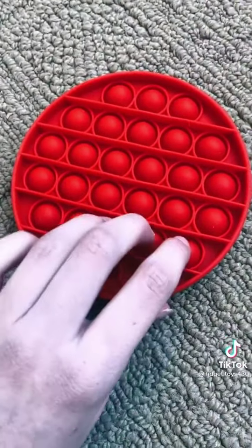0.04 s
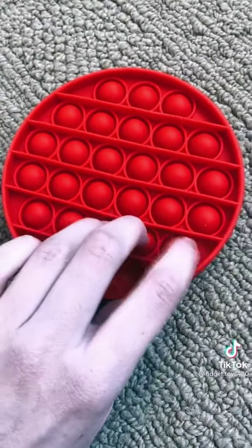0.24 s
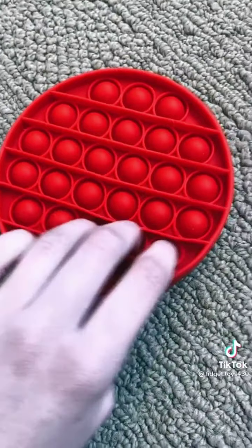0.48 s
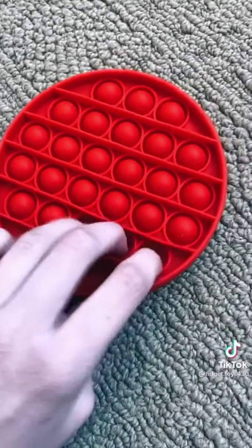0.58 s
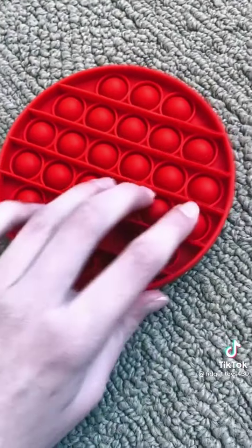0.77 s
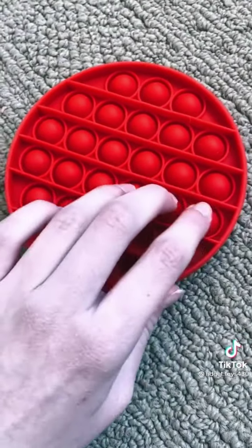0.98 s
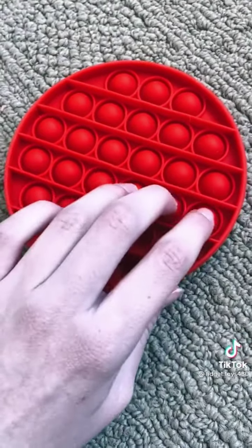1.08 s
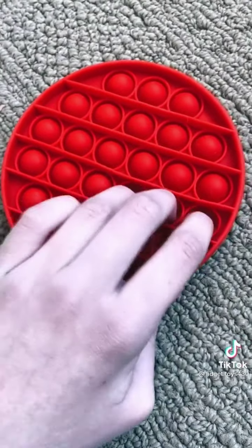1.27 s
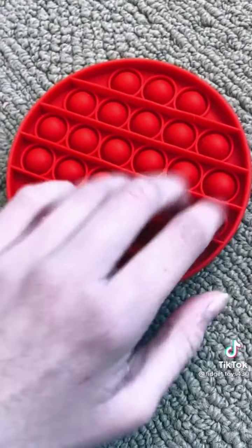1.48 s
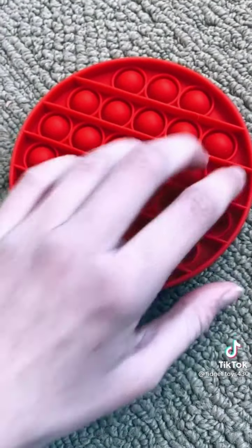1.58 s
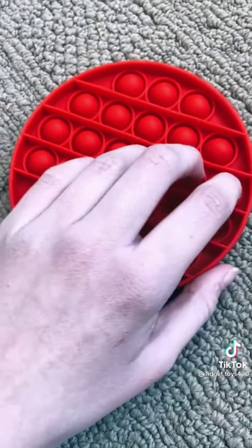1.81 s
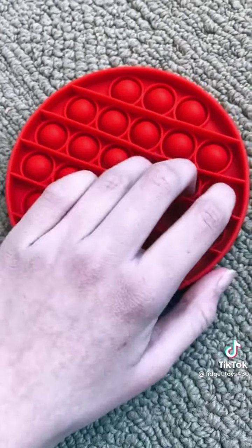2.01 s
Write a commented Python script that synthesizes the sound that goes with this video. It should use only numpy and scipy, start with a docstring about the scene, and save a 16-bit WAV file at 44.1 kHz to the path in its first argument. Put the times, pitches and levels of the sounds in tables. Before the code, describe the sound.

Fingers pop rubbery bubbles of a silicone fidget toy, sharp hollow snaps in a quiet room

```python
"""Fingers press the bubbles of a silicone popping toy on a carpet, close by in a small quiet room.
Each pop is one or more snaps: a filtered click whose highs arrive before its lows, a tiny falling
chirp, topped with a bright crack and a spit of noise. Between the pops, noise swells are fingertips
sliding and short resonant puffs are their ticks; three low knocks are the toy bumping the carpet.
Echoes, ringing modes and a noise tail make the room, over a steady hush and drone."""
import sys
import numpy as np
from scipy import signal
from scipy.fft import rfft, irfft
from scipy.io import wavfile

SR = 44100
rng = np.random.default_rng(int(sys.argv[2]) if len(sys.argv) > 2 else 0)


def output_pcm(signal):
    """Save a mono or channel-first signal as 16-bit PCM at the path in sys.argv[1].

    Samples are clipped to [-1, 1] before scaling.
    """
    pcm = np.clip(np.atleast_2d(signal).T, -1, 1) * 32767
    wavfile.write(sys.argv[1], SR, np.round(pcm).astype(np.int16))


N = 90404  # length in samples
SHORT = 4096  # samples given to each short sound
TIME = np.arange(N) / SR
HZ = np.maximum(np.fft.rfftfreq(N, 1 / SR), 1)

# Steady hush of the room. Each row: frequency in Hz, relative level in dB per Hz.
HUSH_SPECTRUM = [(15, -24.5), (25, 8), (206, -2), (607, -11), (775, -10.5), (887, -13.5), (1700, -13),
                 (1840, -13), (2220, -17.5), (5430, -20), (8590, -23.5), (14800, -22), (16000, -47.5)]
# A fingertip slides. Each row: middle in seconds, spread in seconds, level at the middle in dB,
# centre in Hz, sharpness Q.
FINGER_SLIDES = [(.150, 0.0074, -60, 6840, 0.91), (.405, 0.025, -58.5, 10050, 2.4),
                 (.49, 0.041, -61.5, 8880, 0.34), (.45, 0.063, -62, 1574, 0.86), (.46, .06, -61, 300, .8),
                 (.72, 0.17, -67.5, 1700, 1.12), (1.291, 0.033, -66.5, 1400, 0.76),
                 (1.375, 0.012, -61.5, 1590, 0.75), (1.374, 0.0097, -68, 5200, 6.7),
                 (1.535, .012, -60, 169.7, 1.27), (1.65, 0.083, -69.5, 10640, 1.08),
                 (1.97, .08, -70, 10900, 1.44), (2.029, 0.023, -68, 2500, .4)]
# A dome buckles. Each row: start in seconds, strength in dB, top edge in Hz, ring in Hz,
# ring boost in dB, ring Q, thump in Hz, thump in dB, crack in dB, spit in dB (these three relative
# to the strength), lag of each frequency in its own cycles.
DOME_SNAPS = [(0.1781, -6, 980, 600, 2.5, 2.04, 198, 9.5, -48.5, -46, 0.7),
              (0.201, 2.5, 1270, 450, 1, 2, 242, 3, -37, -26.5, 0.92),
              (0.2121, 20, 2416, 2200, 3.5, 4, 195, 0, -23.5, -25.5, .75),
              (0.2646, 5.5, 2320, 507, 5.5, 3.4, 182, 7, -7.5, -27, 0.822),
              (0.5107, -19.5, 1050, 430, 6.5, 4.3, 193, 11, -26, -16.5, 0.93),
              (0.6803, -18, 1196, 921, 3, 4.9, 260, 9.5, -22.5, -15.5, 0.83),
              (1.1417, 2.5, 1563, 913, 6.5, 2.23, 237, 4.5, -38, -27, 0.53),
              (1.1476, 4, 2750, 1450, 6, 3.1, 201, 2.5, -0.5, -17.5, 0.49),
              (1.1512, 13.5, 2160, 950, 6, 1.8, 220, 0.5, -22.5, -15, 0.548),
              (1.1591, 10.5, 2220, 1450, 10.5, 6.2, 205, 5.5, -15.5, -25.5, 0.64),
              (1.7536, -20, 868, 610, 15, 3.3, 225, 19, -37.5, -34, 0.95),
              (1.7732, 9.5, 1850, 1440, 14, 10.7, 335, 5, -10, -24.5, 0.59),
              (1.7860, 8.5, 3230, 1480, 15, 3.73, 145, 3.5, 1, -28, 0.538)]
# The bright crack of a dome. Each row: resonance in Hz, level in dB, sharpness Q.
CRACK_MODES = [(3589, -5, 1.7), (5000, -0.5, 4.68)]
# Dips that hollow out the direct sound. Each row: frequency in Hz, depth from 0 to 1, sharpness Q.
HOLLOW_DIPS = [(696, .92, 18), (1225, .85, 6), (3436, 0.6, 12), (4730, 0.4, 42), (6300, 0.1, 10)]
# Near surfaces answer. Each row: delay in seconds, level in dB, centre in Hz, sharpness Q.
NEAR_ECHOES = [(.0066, -12.5, 660, 6), (.0128, -2, 1100, 5.4), (0.013, -14.5, 2900, 1.2),
               (.0140, -8, 250, 1.4), (0.021, -13, 950, 2.3)]
# Room modes that stand out. Each row: frequency in Hz, level in dB, sharpness Q.
RINGING_MODES = [(76, 9, 8.2), (99, 0, 17), (215, -8.5, 18), (746, -8.5, 46), (992, -10, 46),
                 (1117, -5, 97), (2150, -9.5, 67)]
# The room's tail. Each row: frequency in Hz, level in dB, time to fall by 60 dB in seconds.
TAIL_BANDS = [(80, -10, 0.18), (158, -14, 0.16), (276, -13, 0.18), (500, -22, .27), (810, -15, 0.33),
              (1100, -9.5, 0.32), (1330, -22, 0.33), (2100, -18, .28), (3400, -11.5, 0.22),
              (4800, -13, 0.18), (8000, -15, .26), (14000, -14, 0.17)]
# Skin lets go of the rubber. Each row: start in seconds, rubber in dB, spit in dB, decay in seconds.
FINGER_TICKS = [(.2583, -22, 1, 0.00039), (0.261, -9, -8.5, .004), (0.7019, -23.5, -27.5, 0.00068),
                (0.7778, -30, -34, .001), (1.5048, -15.5, -39, 0.00078), (1.5100, -18, -30.5, 0.0032),
                (2.0033, -7.5, -23, 0.0013)]
# What a tick rings with. Each row: frequency in Hz, level in dB, sharpness Q.
RUBBER_MODES = [(1480, 6.5, 9), (2300, -2.5, 1.3), (5010, -9, 3)]
# The toy bumps the carpet. Each row: start in seconds, level in dB, pitch in Hz.
CARPET_BUMPS = [(.5568, 12, 157), (0.5718, -2, 100.4), (0.591, -7.5, 150)]

HUSH_DB = -64
DRONE_HZ, DRONE_Q, DRONE_DB = 76, 2, -72.5
BODY_LOW_HZ, THUMP_Q = 300, 2.2
LAG_KNEE_HZ = 28.8  # the lag levels off below this
CRACK_DECAY_S, GRIT = .0008, .8  # grit: noise level relative to the crack's click
SPIT_HZ, SPIT_Q, SPIT_DECAY_S = 10470, .9, 0.0021
HAND_DELAY_S, HAND_DB, HAND_HZ, HAND_Q = .00215, -6.5, 750, 1
MODE_DELAY_S = .015
ROOM_GAP_S, ROOM_BUILD_S = 0.0027, 0.0017  # silence before the tail, then its rise time
BUMP_Q, BUMP_TOP_HZ, BUMP_LOW_HZ = 2.2, 251, 56.4
BUMP_ROOM_SHARE = 0.42  # the carpet soaks up much of a bump before it reaches the room
CUTOFF_HZ = 16000


def amp(db):
    """Decibels to a linear gain."""
    return 10 ** (np.asarray(db) / 20)


def rms_one(x):
    """Scale a sound to rms 1."""
    return x / np.sqrt(np.mean(x ** 2) + 1e-20)


def band(x, hz, q):
    """One resonance, gain 1 on top."""
    w = 2 * np.pi * min(hz, .45 * SR) / SR
    a = np.sin(w) / (2 * q)
    return signal.lfilter([a, 0, -a], [1 + a, -2 * np.cos(w), 1 - a], x + 1e-18)


def double_band(x, hz, q):
    """The same resonance twice in a row, for steeper sides."""
    return band(band(x, hz, q), hz, q)


def cut(x, hz, kind, order):
    """Low-, high- or band-pass."""
    return signal.sosfilt(signal.butter(order, hz, kind, fs=SR, output="sos"), x + 1e-18)


def add(out, start_s, x):
    """Mix a sound in at a start time, trimmed at the end of the scene."""
    i = int(start_s * SR)
    out[i:i + len(x)] += x[:N - i]


def burst(hz, q, decay_s):
    """A dying puff of noise through a doubled resonance."""
    puff = rng.standard_normal(SHORT) * np.exp(-TIME[:SHORT] / decay_s)
    return double_band(puff / np.linalg.norm(puff), hz, q)


def crackle(modes, decay_s):
    """A separate puff into each of a few resonances."""
    return sum(amp(db) * burst(hz, q, decay_s) for hz, db, q in modes)


def floor():
    """Steady faint hush of shaped noise, and a low drone of noise in one narrow band."""
    hzs, dbs = np.transpose(HUSH_SPECTRUM)
    shape = amp(np.interp(np.log(HZ), np.log(hzs), dbs))
    hush = irfft(rfft(rng.standard_normal(N)) * shape, N)
    drone = double_band(rng.standard_normal(N), DRONE_HZ, DRONE_Q)
    return amp(HUSH_DB) * rms_one(hush) + amp(DRONE_DB) * rms_one(drone)


def slides():
    """Skin brushing over silicone: band-limited noise that swells and fades."""
    out = np.zeros(N)
    for middle_s, spread_s, db, hz, q in FINGER_SLIDES:
        rub = rms_one(double_band(rng.standard_normal(N), hz, q))
        swell = np.exp(-.5 * ((TIME - middle_s) / spread_s) ** 2)
        out += amp(db) * swell * rub
    return out


def disperse(x, cycles):
    """Soft rubber carries high notes faster than low ones: each is late by some of its own cycles."""
    hz = np.fft.rfftfreq(SHORT, 1 / SR)
    phase = -2 * np.pi * cycles * np.log(1 + hz / LAG_KNEE_HZ)
    return irfft(rfft(x) * np.exp(1j * phase))


def crack():
    """The click of the buckling rim rings its high modes, with a little grit."""
    push = signal.unit_impulse(SHORT)
    click = np.zeros(SHORT)
    for k, (hz, db, q) in enumerate(CRACK_MODES):
        click += (-1) ** k * amp(db) * double_band(push, hz, q)  # modes alternate in sign
    return click + GRIT * crackle(CRACK_MODES, CRACK_DECAY_S)


def snaps():
    """Each snap is one push on the dome: a damped ring, a low thump, a crack and a spit of air."""
    out, push = np.zeros(N), signal.unit_impulse(SHORT)
    for (start_s, db, edge_hz, ring_hz, ring_db, ring_q, thump_hz, thump_db,
         crack_db, spit_db, lag_cycles) in DOME_SNAPS:
        body = cut(push, BODY_LOW_HZ, "high", order=2)
        ringing = body + (amp(ring_db) - 1) * band(body, ring_hz, ring_q)
        thump = amp(thump_db) * band(push, thump_hz, THUMP_Q)
        dome = cut(ringing - thump, edge_hz, "low", order=6)
        spit = amp(spit_db) * burst(SPIT_HZ, SPIT_Q, SPIT_DECAY_S)
        snap = disperse(dome, lag_cycles) + amp(crack_db) * crack() + spit
        add(out, start_s, amp(db) * snap)
    return out


def tail():
    """Diffuse answer of the room to a click: noise dying band by band."""
    hzs, dbs, t60s = np.transpose(TAIL_BANDS)
    edges = 45 * 2 ** np.arange(0, 8.6, 1 / 3)  # third octaves
    white, out = rng.standard_normal((2, N // 2)), 0
    age = np.maximum(TIME[:N // 2] - ROOM_GAP_S, 0)
    build = 1 - np.exp(-age / ROOM_BUILD_S)
    for k, (low, high) in enumerate(zip(edges, edges[1:])):
        log_middle = np.log(low * high) / 2
        db = np.interp(log_middle, np.log(hzs), dbs)
        t60 = np.interp(log_middle, np.log(hzs), t60s)
        fade = np.exp(-np.log(1000) * age / t60)
        # neighbouring bands draw on different noise
        part = cut(white[k % 2], [low, high], "band", order=3) * build * fade
        width_gain = np.sqrt(2 * (high - low) / SR)  # a click's energy in this band
        out = out + amp(db) * width_gain * part / np.linalg.norm(part)
    return out


def room(x):
    """The slightly hollow direct sound, a few coloured echoes, ringing room modes and the tail."""
    out = x.copy()
    # the hand throws the sound straight back
    add(out, HAND_DELAY_S, amp(HAND_DB) * band(x, HAND_HZ, HAND_Q))
    for hz, depth, q in HOLLOW_DIPS:
        out = out - depth * band(out, hz, q)
    for delay_s, db, hz, q in NEAR_ECHOES:
        add(out, delay_s, amp(db) * double_band(x, hz, q))
    for hz, db, q in RINGING_MODES:
        add(out, MODE_DELAY_S, amp(db) * band(x, hz, q))
    return out + signal.fftconvolve(x, tail())[:N]


def ticks():
    """Small sticky clicks of the fingertips: noise puffs ring the rubber and spit up high."""
    out = np.zeros(N)
    for start_s, rubber_db, spit_db, decay_s in FINGER_TICKS:
        rubber = amp(rubber_db) * crackle(RUBBER_MODES, decay_s)
        spit = amp(spit_db) * burst(SPIT_HZ, SPIT_Q, decay_s)
        add(out, start_s, rubber + spit)
    return out


def bumps():
    """Dull knocks of the toy on the carpet: clicks through one low, heavily damped resonance."""
    out, push = np.zeros(N), signal.unit_impulse(SHORT)
    for start_s, db, hz in CARPET_BUMPS:
        knock = cut(band(push, hz, BUMP_Q), BUMP_TOP_HZ, "low", order=4)
        add(out, start_s, amp(db) * knock)
    return cut(out, BUMP_LOW_HZ, "high", order=3)


def scene():
    """The toy and the fingers in the room; slides and part of each bump stay dry."""
    thud = bumps()
    in_room = room(snaps() + ticks() + BUMP_ROOM_SHARE * thud)
    close = (1 - BUMP_ROOM_SHARE) * thud + slides()
    return (in_room + close + floor())[None]


def record(dry):
    """The microphone drops the deepest bass and dulls the highest treble; the top is cut."""
    no_rumble = cut(dry, 36, "high", order=3)
    dull = cut(no_rumble, 11300, "low", order=4)
    steep = signal.ellip(10, .1, 80, CUTOFF_HZ, fs=SR, output="sos")
    return signal.sosfilt(steep, dull)


dry = scene()
out = record(dry)
output_pcm(out)
```